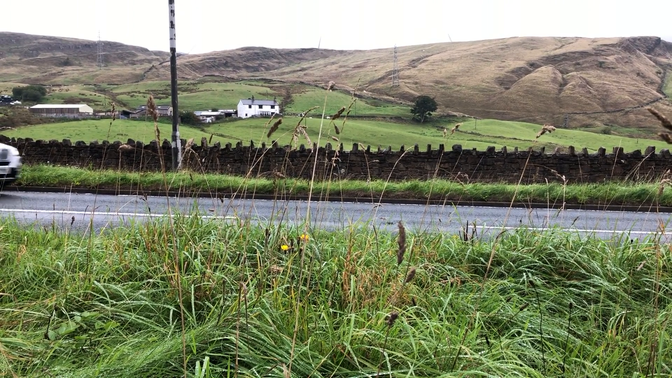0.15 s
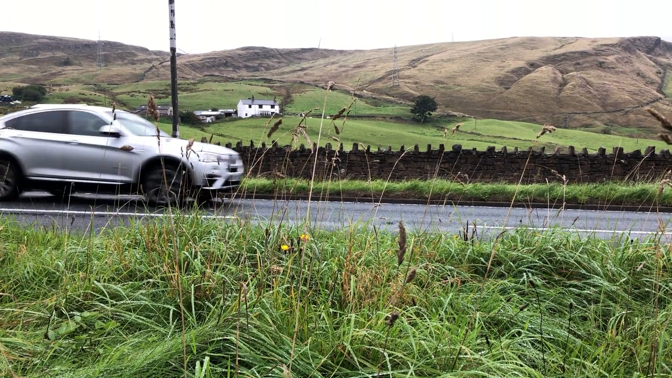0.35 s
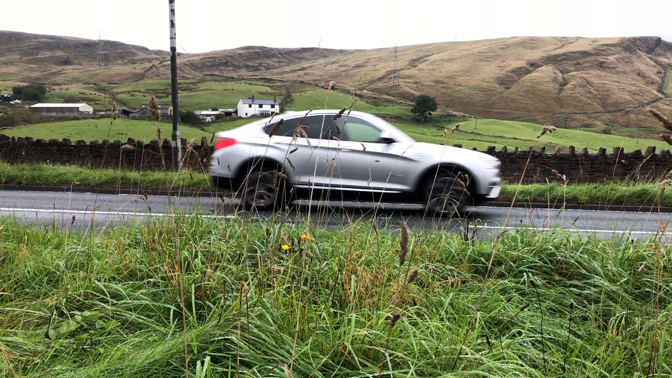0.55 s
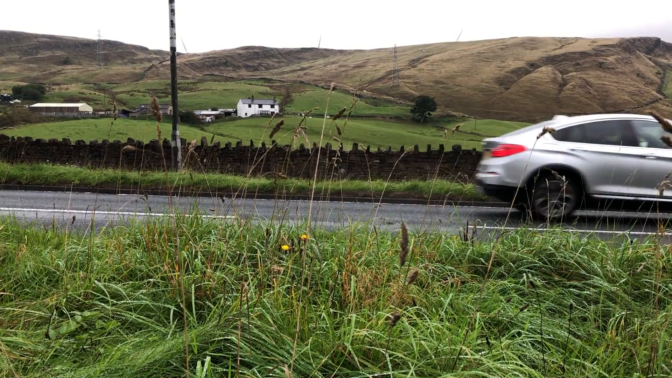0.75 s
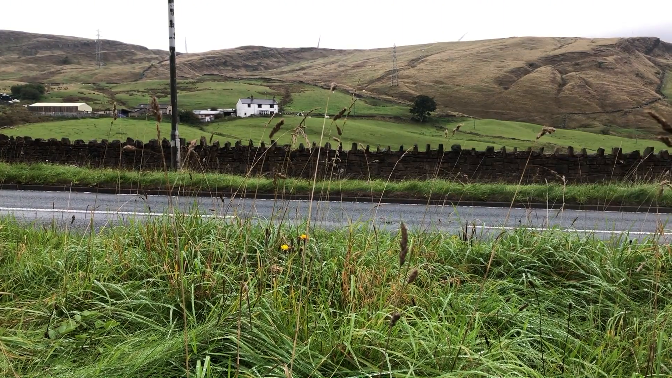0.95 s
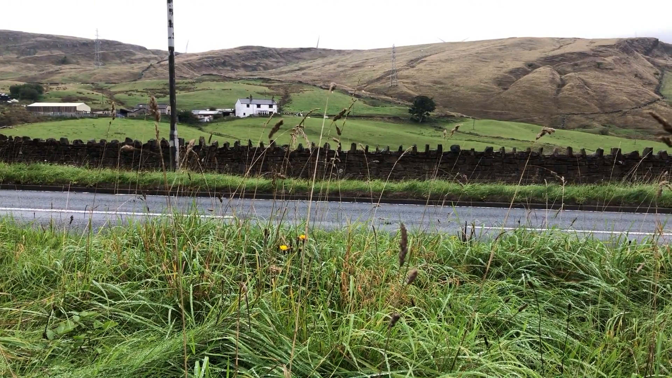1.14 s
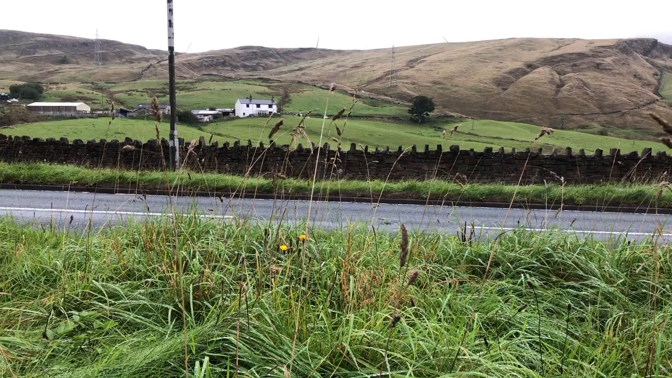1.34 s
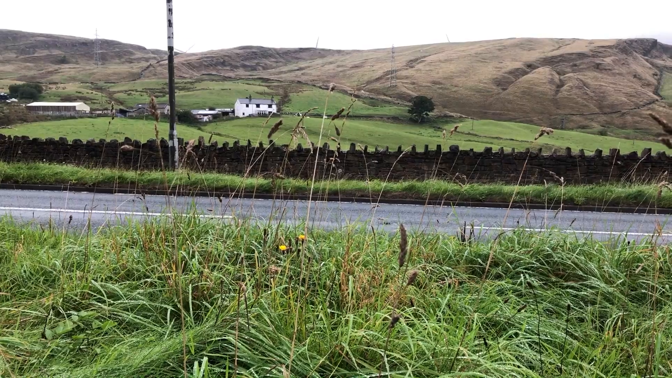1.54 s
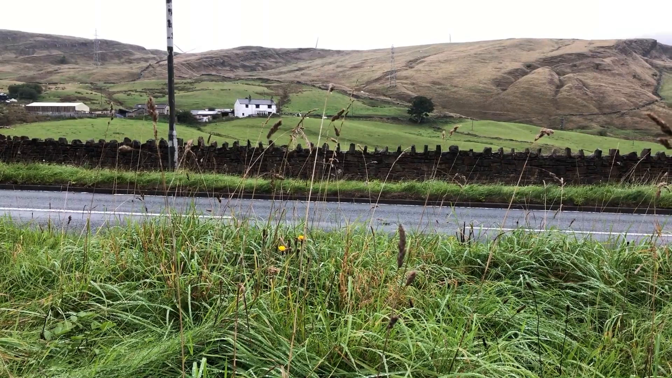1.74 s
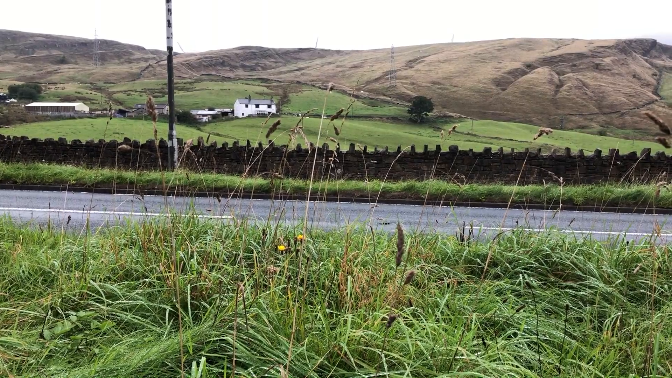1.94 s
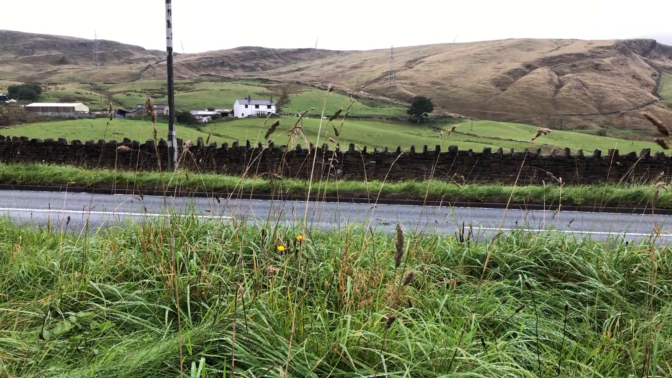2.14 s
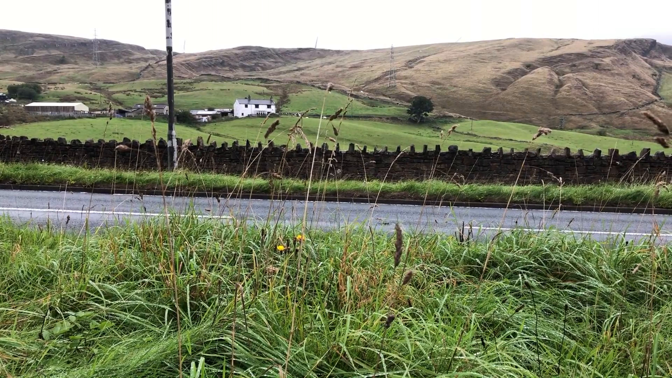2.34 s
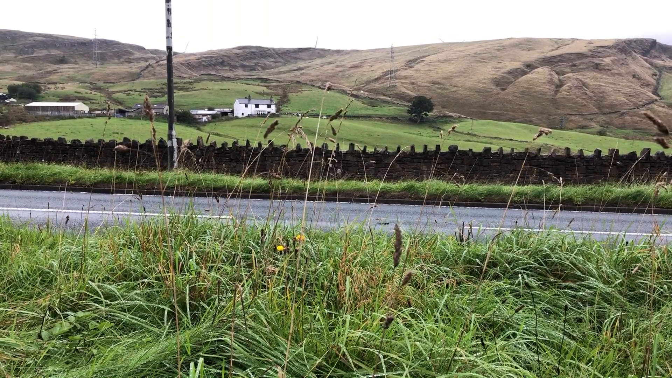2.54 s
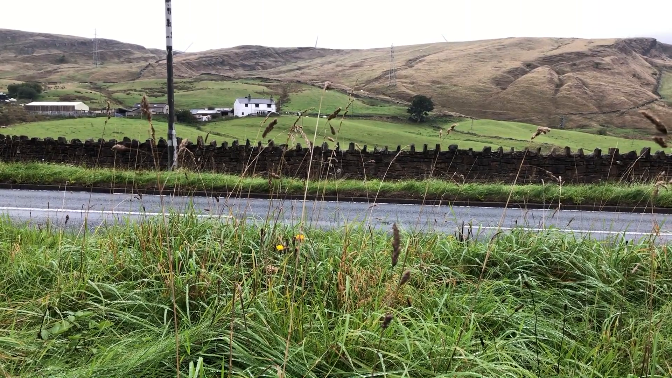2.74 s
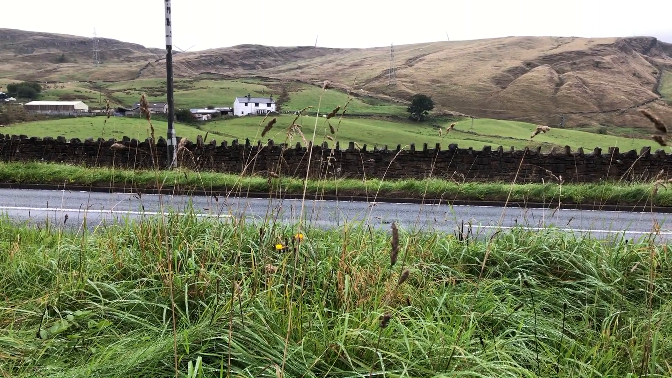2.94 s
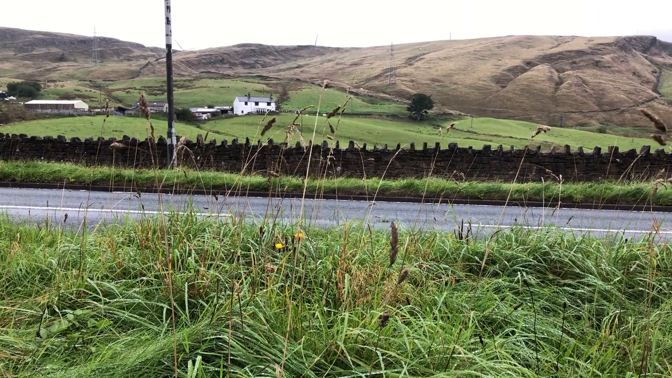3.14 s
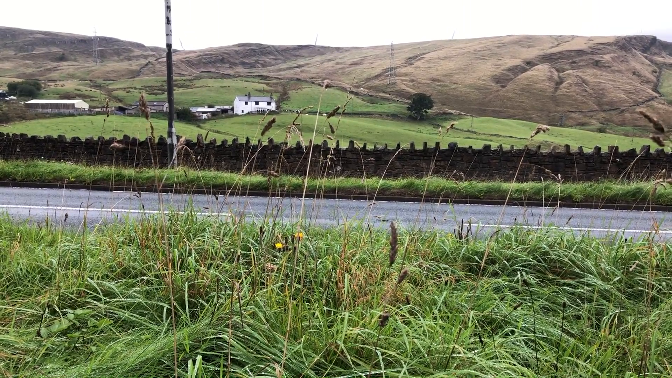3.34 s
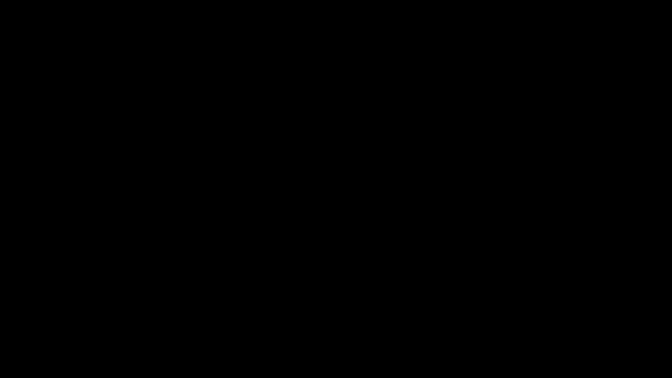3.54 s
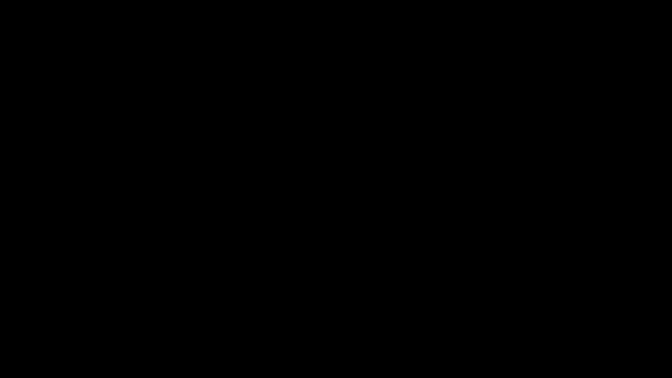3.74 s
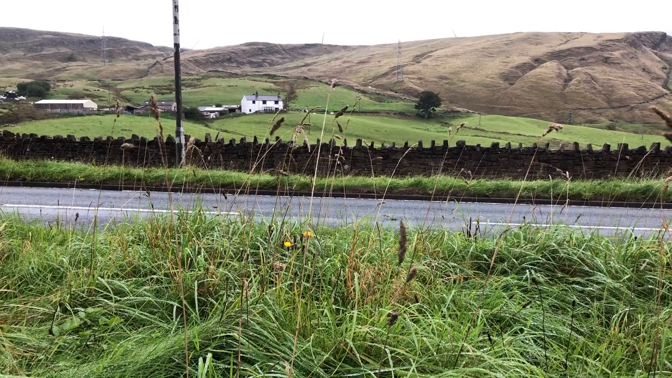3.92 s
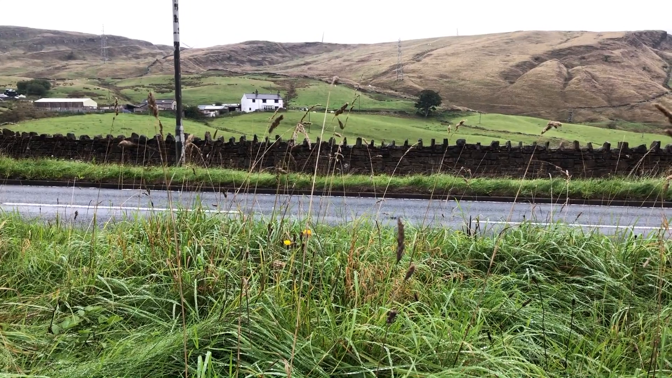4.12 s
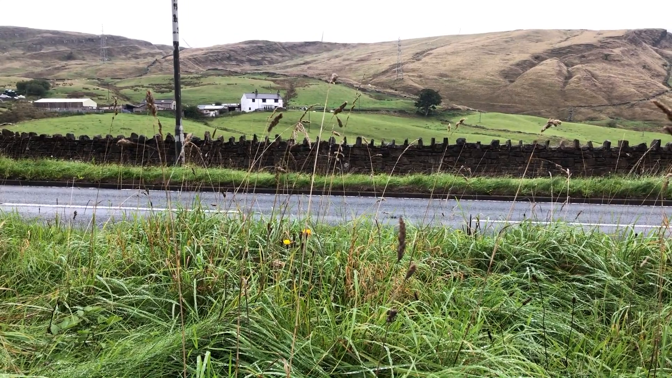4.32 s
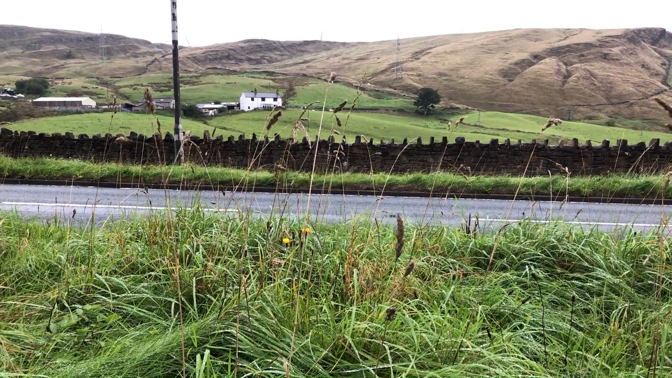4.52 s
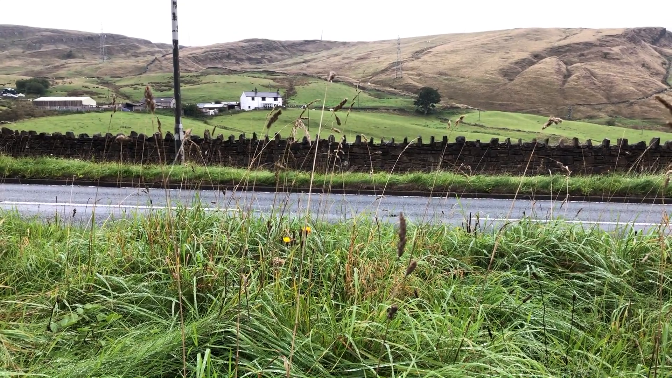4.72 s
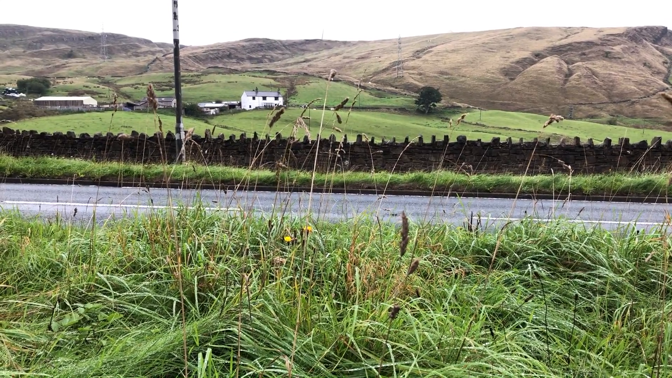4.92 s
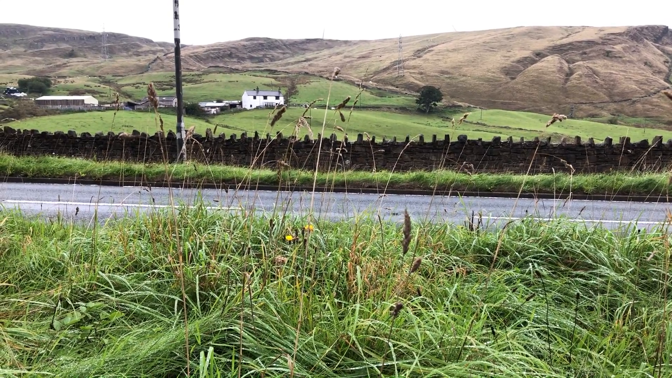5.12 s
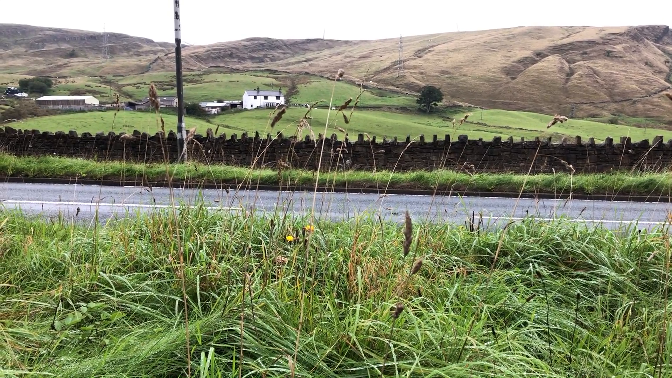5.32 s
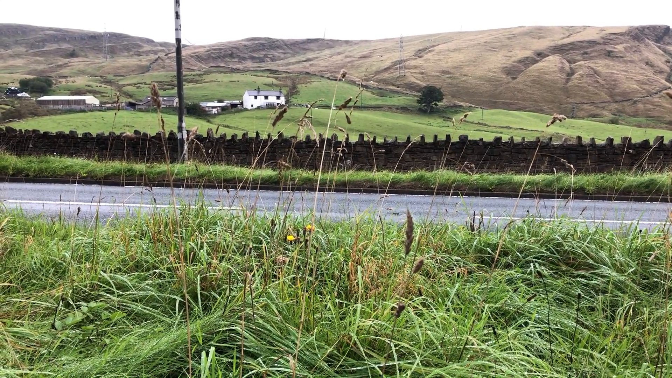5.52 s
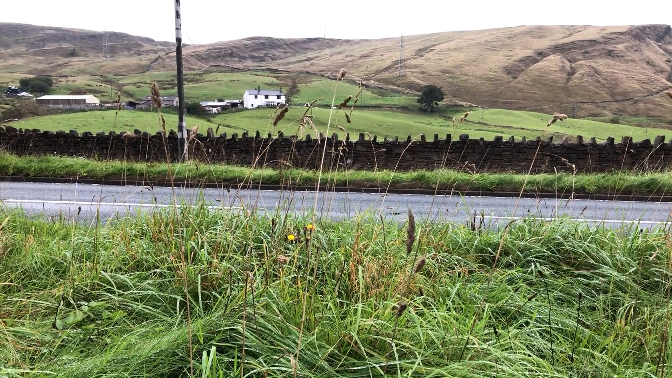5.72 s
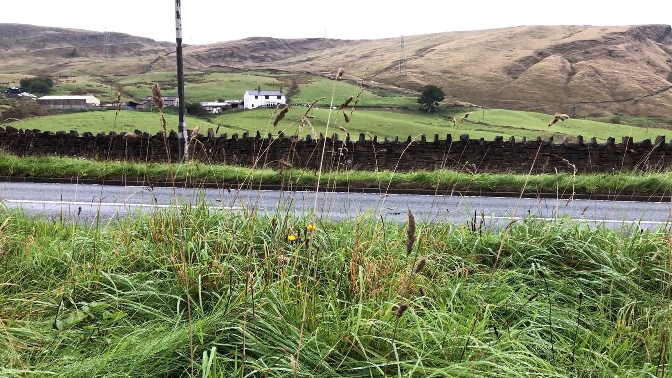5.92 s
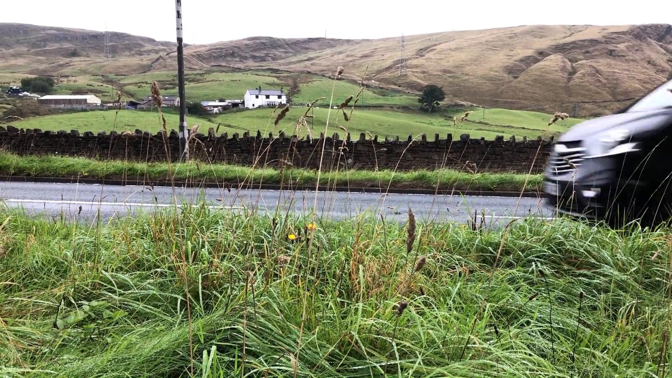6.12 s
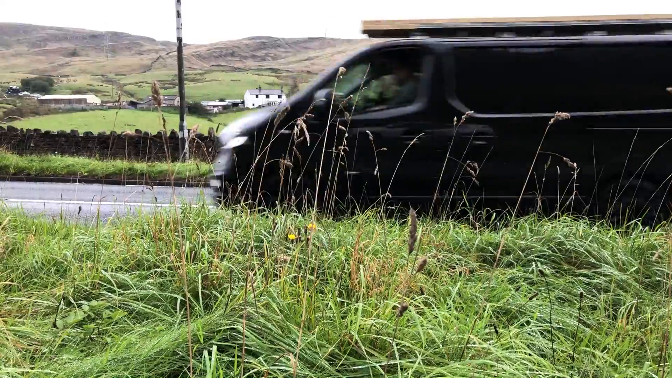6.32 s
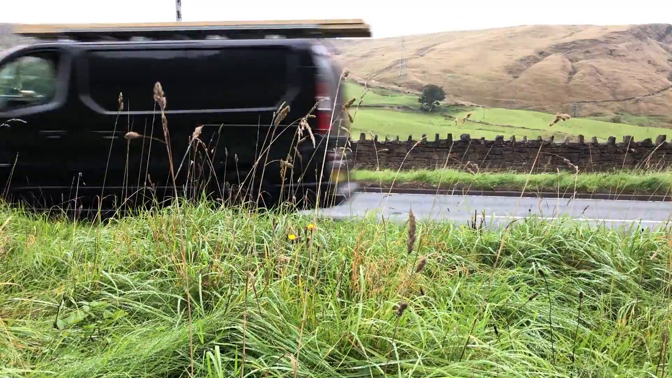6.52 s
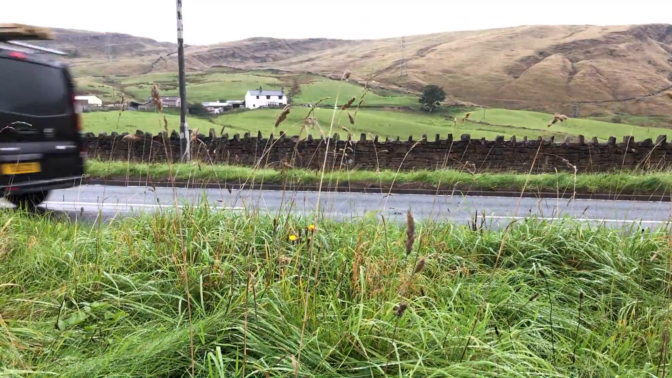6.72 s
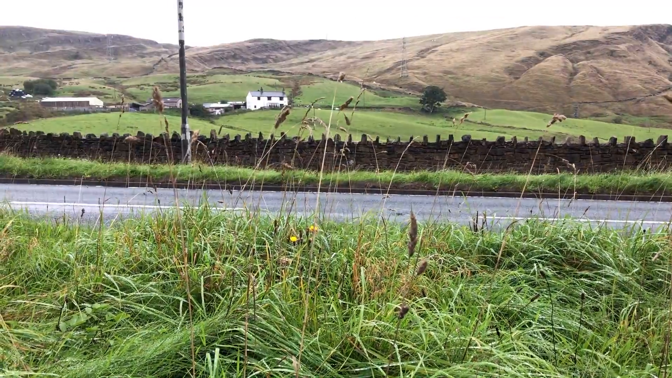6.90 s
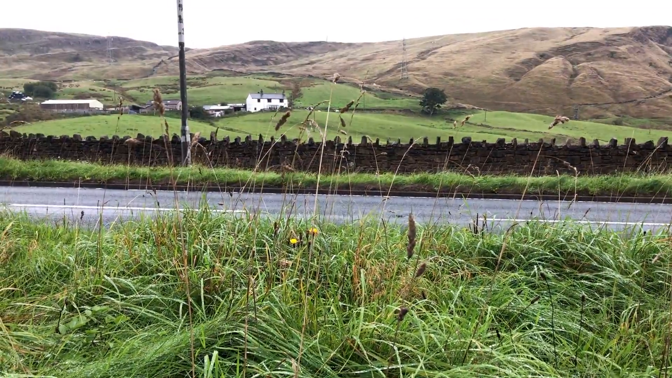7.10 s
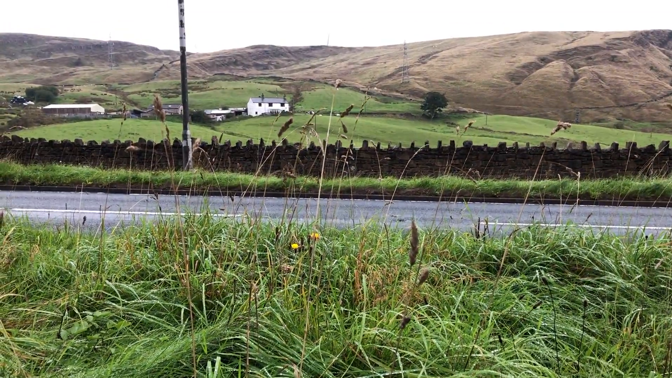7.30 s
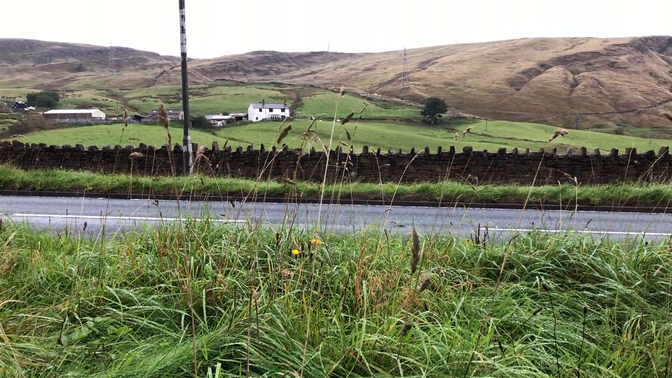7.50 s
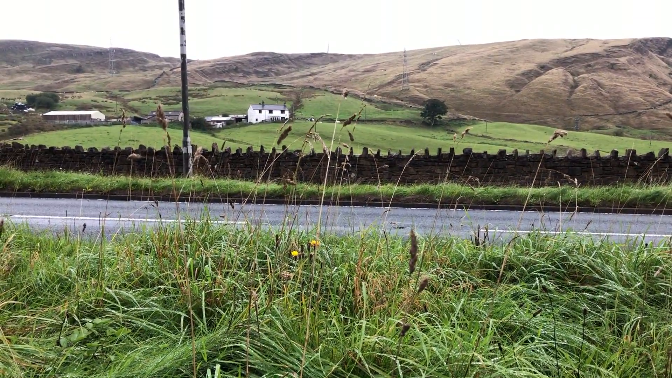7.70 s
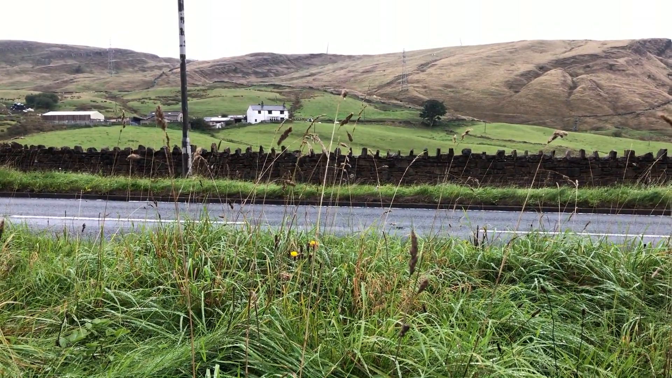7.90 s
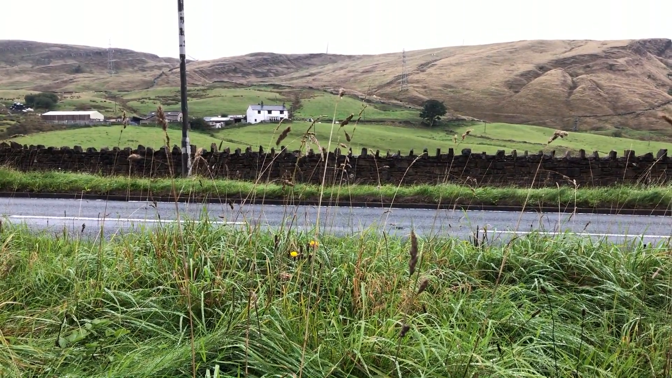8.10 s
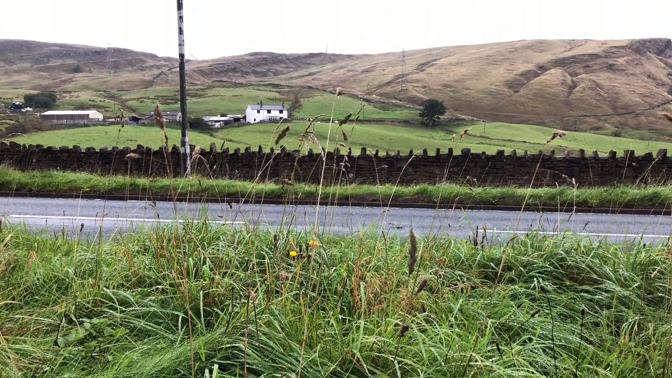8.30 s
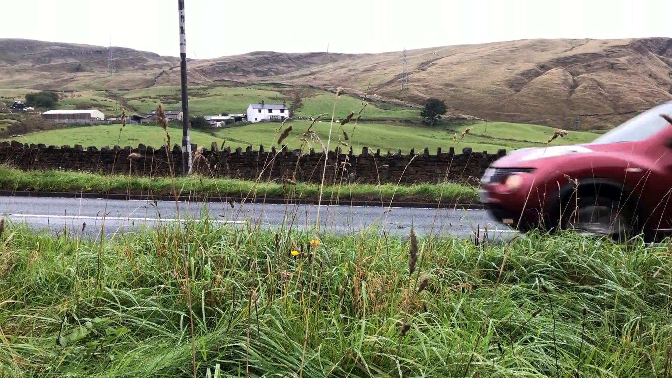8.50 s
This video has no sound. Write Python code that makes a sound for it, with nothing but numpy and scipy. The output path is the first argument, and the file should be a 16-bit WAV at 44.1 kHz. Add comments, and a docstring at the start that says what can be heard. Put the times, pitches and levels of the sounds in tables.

```python
"""On the grass verge of a wet country road, three vehicles pass: a car in the far lane, then a diesel
van and a second car in the near lane. Tyres roar and throw up water, bodies rumble, and each engine
note drops as it goes by. These sounds swell and fade with the vehicle's distance, and far away the
soft ground swallows the low middle of the roar. Distant traffic hums, a breeze thrums on the
microphone and a few drops tick in the grass."""
import sys
import numpy as np
from scipy import signal
from scipy.fft import rfft, irfft, next_fast_len
from scipy.io import wavfile

SR = 44100
rng = np.random.default_rng(int(sys.argv[2]) if len(sys.argv) > 2 else 0)


def put_to_file(sound):
    """Save the sound as 16-bit audio at rate SR, in the file named by the first command-line argument."""
    columns = np.atleast_2d(sound).T  # one column per channel
    safe = np.clip(columns, -1, 1)
    whole_steps = np.round(safe * 32767)
    wavfile.write(sys.argv[1], SR, whole_steps.astype(np.int16))


N = 377055
T = np.arange(N) / SR
SOUND_SPEED = 343  # metres a second


def from_db(db):
    """Turn decibels into a gain, the number a sound is multiplied by."""
    return 10 ** (np.asarray(db) / 20)


def unit_power(x):
    """Scale a sound so that its average power is 1."""
    return x / np.sqrt(np.mean(x ** 2) + 1e-20)


def drift(per_s):
    """A random wobble of about size 1 that turns some per_s times a second."""
    return unit_power(np.interp(T * per_s, np.arange(4096), rng.standard_normal(4096)))


def bump(at_s, length_s):
    """A smooth rise to 1 and back, taking about length_s each way."""
    return np.exp(-.5 * ((T - at_s) / length_s) ** 2)


def coloured(x, colour):
    """Give a sound a colour (a balance of low and high) that falls away steeply past its ends."""
    size = next_fast_len(N)
    octave = np.log2(np.maximum(np.arange(size // 2 + 1) * SR / size, 1))
    hz, db = np.transpose(colour)
    octaves_outside = np.abs(octave - np.clip(octave, np.log2(hz[0]), np.log2(hz[-1])))
    gain = from_db(np.interp(octave, np.log2(hz), db) - 46 * octaves_outside)
    return unit_power(irfft(rfft(x, size) * gain, size)[:N])


def noise(colour):
    """Smooth noise of one colour."""
    return coloured(rng.standard_normal(N), colour)


def band_noise(low_hz, high_hz):
    """Noise that lies mostly between two frequencies."""
    band = signal.butter(2, [low_hz, min(high_hz, .45 * SR)], "band", fs=SR, output="sos")
    return signal.sosfilt(band, rng.standard_normal(N))


def narrow_noise(pitch_hz, width_hz):
    """An uneven tone around a moving pitch."""
    smoothing = signal.butter(2, width_hz, fs=SR, output="sos")
    wobble = signal.sosfilt(smoothing, rng.standard_normal((2, N)))
    phase = 2 * np.pi * np.cumsum(pitch_hz) / SR
    return unit_power(wobble[0] * np.cos(phase) + wobble[1] * np.sin(phase))


def surges(rows, width_ratio):
    """Short swells of noise, each around its own pitch."""
    return sum(from_db(db) * bump(at_s, length_s)
               * unit_power(band_noise(hz / width_ratio, hz * width_ratio))
               for at_s, db, length_s, hz in rows)


def crossfade(first, second, at_s, over_s):
    """Fade one sound out while the next fades in."""
    share = .5 + .5 * np.tanh((T - at_s) / over_s)
    return np.sqrt(1 - share) * first + np.sqrt(share) * second


def far_to_near(far_lane, near_lane, at_s=4.15, dip_db=5):
    """The scene changes: the far lane's sound fades out as the near lane's fades in, and the level dips
    briefly."""
    dip = from_db(-dip_db * bump(at_s, length_s=0.15))
    return crossfade(far_lane, near_lane, at_s, over_s=0.084) * dip


# The vehicles: (passing time [s], speed [m/s], closest distance [m], firing rate [Hz],
# base engine level [dB])
CAR = (0.5241, 20, 7.5, 123, -38.5)
VAN = (6.3, 20, 5, 65, -32)
SECOND_CAR = (8.7, 18, 5, 88, -28)
VEHICLES = [CAR, VAN, SECOND_CAR]
def distance(vehicle):
    """Metres from the listener to a vehicle driving steadily along the straight road."""
    passing_s, speed, closest_m = vehicle[:3]
    return np.hypot(closest_m, speed * (T - passing_s))


def swells(rows):
    """One gain curve per vehicle: it loses a set number of dB each time the distance doubles."""
    gains = []
    for vehicle, (peak_db, delay_s, width_m, coming_db, going_db) in zip(VEHICLES, rows):
        passing_s, speed = vehicle[:2]
        along_m = speed * (T - passing_s - delay_s)
        doublings = np.log2(np.hypot(1, along_m / width_m))
        gains.append(from_db(peak_db - np.where(along_m < 0, coming_db, going_db) * doublings))
    return gains


def passing_noise(vehicle, near_colour, far_colour, reach_m):
    """Close by a vehicle sounds full; beyond reach_m its sound skims the grass and turns hollow."""
    extra_m = distance(vehicle) - vehicle[2]
    near_share = 1 / (1 + (extra_m / reach_m) ** 2)
    return np.sqrt(near_share) * noise(near_colour) + np.sqrt(1 - near_share) * noise(far_colour)


def engine(vehicle, tones, rough, wander):
    """Cylinders fire in a hum. Its travel time shrinks, then grows, so the note drops on passing."""
    closest_m, firing_hz, level_db = vehicle[2:]
    away_m = distance(vehicle)
    firings = firing_hz * (T - away_m / SOUND_SPEED + wander * np.cumsum(drift(6)) / SR)
    note = sum(from_db(db) * (1 + rough * drift(25))
               * np.sin(2 * np.pi * (multiple * firings + rng.random())) for multiple, db in tones)
    return from_db(level_db) * unit_power(note) * closest_m / away_m


# The tones in an engine's hum: (multiple of the firing rate, relative level [dB])
PETROL_TONES = [(1, -2.5), (2, -8), (3, -5), (4, -11)]
DIESEL_TONES = [(1, 0), (1.5, -14), (2, -3), (2.5, -9), (3, -11), (4, -13), (5, -14)]
def engines():
    """Three engines hum in turn; the first dies away before the van's comes through."""
    car = engine(CAR, PETROL_TONES, rough=0.44, wander=0.0137)
    van = engine(VAN, DIESEL_TONES, rough=.15, wander=.005)
    second_car = engine(SECOND_CAR, PETROL_TONES, rough=0.25, wander=0.0036)
    # the van blocks the second car's sound until it has gone by
    near_lane = van + crossfade(0, second_car, at_s=8.0, over_s=0.65)
    return crossfade(car, 0, at_s=2.8, over_s=0.36) + crossfade(0, near_lane, at_s=5.4, over_s=0.45)


def tyre_boom(vehicle, pitch_hz=204.6, relative_db=-10):
    """The air inside a tyre rings with a low note that drops on passing."""
    pitch_shift = 1 - np.gradient(distance(vehicle), T) / SOUND_SPEED
    return from_db(relative_db) * narrow_noise(pitch_hz * pitch_shift, width_hz=7.3)


# How each vehicle's rumble swells: (base peak level [dB], delay after passing [s], half-width
# along the road [m], loss per doubling of distance coming [dB], the same going [dB])
RUMBLE_SWELLS = [(-21.5, 0.11, 9.6, 2.5, 9.5), (-22, 0.14, 5.9, 7.5, 6.7), (-20, 0.01, 3.6, 5.5, 7)]
# Colours of the rumble: (frequency [Hz], relative level [dB])
CAR_RUMBLE_NEAR = [(45, -21), (70, -12), (95, 0.5), (135, 0.5), (180, -5.5), (230, 2.5), (310, -3),
                   (380, -21)]
CAR_RUMBLE_FAR = [(45, -31.5), (70, -18), (95, -2.5), (130, -4.5), (175, 1.5), (235, -0.5), (310, -5.5),
                  (380, -16)]
NEAR_LANE_RUMBLE = [(58, -20), (75, 0), (100, 0), (150, 4), (190, 0.5), (245, 2), (315, -1.5), (380, -16.5)]
def rumble(uneven_db=0.36):
    """The coarse, uneven road shakes tyre walls and body panels."""
    car, van, second_car = swells(RUMBLE_SWELLS)
    shaking = passing_noise(CAR, CAR_RUMBLE_NEAR, CAR_RUMBLE_FAR, reach_m=6.9)
    far_lane = car * (shaking + tyre_boom(CAR))
    near_lane = np.hypot(van, second_car) * noise(NEAR_LANE_RUMBLE)
    return far_to_near(far_lane, near_lane) * from_db(uneven_db * drift(9))


# The ring of each vehicle's tread: (pitch coming [Hz], pitch going [Hz], level against the roar
# coming [dB], the same going [dB], delay of the shift after passing [s])
TREAD_RINGS = [(927, 1090, -10.5, -11.5, .42), (1565, 1200, -8.5, -12, .1), (1126, 1000, -12, -17, 0.038)]
def tread_rings():
    """Unevenly spaced tread blocks give each vehicle a blurry note that shifts as it goes by."""
    rings = []
    for vehicle, (coming_hz, going_hz, coming_db, going_db, delay_s) in zip(VEHICLES, TREAD_RINGS):
        gone = .5 + .5 * np.tanh((T - vehicle[0] - delay_s) / .2)  # 0 coming, 1 going
        gain = from_db(coming_db + gone * (going_db - coming_db))
        rings.append(gain * narrow_noise(coming_hz + gone * (going_hz - coming_hz), width_hz=59))
    return rings


# How each vehicle's roar swells: columns as in RUMBLE_SWELLS
ROAR_SWELLS = [(-20, 0.018, 12.5, 6.1, 12.85), (-22.5, 0.15, 9, 9.7, 10), (-21, 0.059, 5.63, 7.8, 7)]
# Colours of the roar, close by and far off: (frequency [Hz], relative level [dB])
CAR_ROAR_NEAR = [(330, -7), (390, -1.5), (470, -3), (580, -5), (760, -2.5), (930, 1.5), (1250, -3.5),
                 (1470, -3), (1850, -4.5), (2300, -11), (2900, -17.5)]
CAR_ROAR_FAR = [(330, -17), (440, -15), (650, -12.5), (860, -1), (1040, -4), (1300, 2.5), (1650, 0.5),
                (1900, -10), (2300, -13), (2900, -13.5)]
VAN_ROAR_NEAR = [(330, -8), (380, -3), (490, -3), (600, -7.5), (800, -3.5), (940, 0.5), (1120, -5),
                 (1450, -6), (1960, -11.5), (2900, -18.5)]
VAN_ROAR_FAR = [(330, -4), (380, -10), (460, -4.5), (590, -10.5), (780, -6), (950, -4.5), (1200, -1.5),
                (1550, -2), (1900, -5), (2300, -12), (2900, -16.5)]
SECOND_CAR_ROAR_NEAR = [(330, -11), (440, -3), (600, -6.5), (760, -1.5), (1080, 0), (1600, -5),
                        (1900, -9.5), (2900, -20.5)]
SECOND_CAR_ROAR_FAR = [(330, 0), (450, -2), (650, -4), (920, 6), (1300, 6), (1900, -1), (2400, -17),
                       (2900, -34)]
TRAFFIC_ROAR = [(190, -48), (330, -21), (454, -21), (511, -19.5), (671, -17.5), (755, -8.5), (1020, -1.5),
                (1450, -8.5), (1770, -7), (2460, -24.5), (2900, -25.5), (3770, -45), (6380, -120)]
def tyre_roar(traffic_db=-41.5, flutter_db=.5):
    """Tyre treads roar on the road, under the three vehicles and in the distant traffic."""
    roars = [passing_noise(CAR, CAR_ROAR_NEAR, CAR_ROAR_FAR, reach_m=13.6),
             passing_noise(VAN, VAN_ROAR_NEAR, VAN_ROAR_FAR, reach_m=5.0),
             passing_noise(SECOND_CAR, SECOND_CAR_ROAR_NEAR, SECOND_CAR_ROAR_FAR, reach_m=8.9)]
    car, van, second_car = [gain * (roar + ring)
                            for gain, roar, ring in zip(swells(ROAR_SWELLS), roars, tread_rings())]
    traffic = from_db(traffic_db) * noise(TRAFFIC_ROAR)
    return far_to_near(car + traffic, van + second_car) * from_db(flutter_db * drift(40))


def droplets(per_s, spread_db):
    """Drops land at random, many small and a few large."""
    sizes = from_db(spread_db * np.minimum(rng.exponential(1, N), 4))
    return unit_power(sizes * rng.choice([-1, 1], N) * (rng.random(N) < per_s / SR))


def water_hiss(colour, crackle, flutter_db, patchy_db=1.2):
    """A wet hiss whose narrow bands flicker at random, with a crackle of drops in it."""
    edges_hz = np.geomspace(.8 * colour[0][0], 1.15 * colour[-1][0], 13)  # twelve bands
    hiss = sum(band_noise(low, high) * from_db(patchy_db * drift(22))
               for low, high in zip(edges_hz, edges_hz[1:]))
    drops = crackle * droplets(per_s=1200, spread_db=3.0)
    return coloured(hiss + drops, colour) * from_db(flutter_db * drift(45))


def lane_gains(rows, traffic_db):
    """Two gain curves: the far lane with the distant traffic, and the near lane."""
    car, van, second_car = swells(rows)
    far_lane = np.hypot(car, from_db(traffic_db))
    near_lane = np.hypot(van, second_car)
    return far_to_near(far_lane, 0), far_to_near(0, near_lane)


# How each vehicle's wash (swish plus spray) and mist swell: columns as in RUMBLE_SWELLS
WASH_SWELLS = [(-40.5, 0.071, 10.1, 9.7, 9.77), (-39.5, 0.35, 12.35, 13.5, 13.4),
               (-41.5, 0.14, 4.8, 6.6, 7)]
MIST_SWELLS = [(-54.8, .24, 10, 11, 11.4), (-53.5, .31, 12.6, 15, 20), (-53.5, .12, 4.1, 7.7, 7)]
# Colours of the flying water: (frequency [Hz], relative level [dB])
SWISH = [(2100, 0.5), (2650, 0.5), (3000, -0.5), (3900, -5), (5000, -9.5), (5900, -18.5), (7500, -17.5)]
SPRAY = [(4300, -5), (5600, -1), (6500, -1), (8200, -3), (9800, -6.5), (10800, -13.5), (13000, -27)]
FAR_LANE_MIST = [(9000, -7), (10800, 0.5), (12500, 2), (14000, -3.5), (15700, -10)]
NEAR_LANE_MIST = [(9000, -6), (10800, 1), (12500, 0), (14000, -3.5), (15700, -7)]
def tyre_water(swish_gain_db=4.0, spray_gain_db=-2.5, spurt_db=0.31, puddle_db=0.1):
    """The tread squeezes water out, flings it up as spray and trails a mist, all in uneven spurts."""
    swish = from_db(swish_gain_db) * water_hiss(SWISH, crackle=0.49, flutter_db=0.8)
    spray = from_db(spray_gain_db) * water_hiss(SPRAY, crackle=0.55, flutter_db=0.1)
    wash = (swish + spray) * np.hypot(*lane_gains(WASH_SWELLS, traffic_db=-71))
    far_lane, near_lane = lane_gains(MIST_SWELLS, traffic_db=-90)
    mist = far_lane * water_hiss(FAR_LANE_MIST, crackle=.5, flutter_db=0)
    mist += near_lane * water_hiss(NEAR_LANE_MIST, crackle=0.59, flutter_db=1.5)
    return (wash + mist) * from_db(spurt_db * drift(55) + puddle_db * drift(7.8))


# Colour of the breeze: (frequency [Hz], relative level [dB])
BREEZE = [(12, -16), (25, -7), (42, -4), (60, -4), (100, -0.5), (200, -24)]
# Gusts of air: (time [s], level [dB], length [s])
GUSTS = [(.62, -39, 0.15), (3.0, -68, 0.64), (4.98, -45, 0.055), (5.396, -53.5, 0.34), (6.515, -48, .14)]
def breeze(steady_db=-53):
    """Moving air thrums on the microphone, swelling in gusts and in the wake of a vehicle."""
    gusts = sum(from_db(db) * bump(at_s, length_s) for at_s, db, length_s in GUSTS)
    return noise(BREEZE) * (from_db(steady_db) + gusts)


# Short booms and hums: (time [s], level [dB], length [s], pitch [Hz])
BRIEF_SWELLS = [(.54, -22.5, 0.028, 201), (.76, -20.5, 0.022, 205), (.93, -25, 0.076, 192),
                (1.05, -27, .04, 1070), (1.78, -35.5, 0.039, 263), (6.17, -26, 0.032, 200),
                (6.44, -26, 0.057, 884), (6.55, -31, 0.16, 473)]
def brief_swells():
    """Short booms and hums swell for a moment in the rumble and roar."""
    return surges(BRIEF_SWELLS, width_ratio=1.116)


# Splashes: (time [s], level [dB], length [s], middle frequency [Hz])
SPLASHES = [(1.65, -55.5, .14, 4200), (2.3, -56, 0.14, 4500), (3.55, -61, .11, 4140),
            (6.578, -35, 0.004, 3600), (6.604, -32, 0.0058, 3260), (6.772, -39.5, 0.028, 4900),
            (6.955, -38, 0.023, 4000), (7.135, -38, 0.008, 3280), (7.66, -49.5, 0.037, 6460),
            (7.84, -49, 0.028, 5950)]
def splashes():
    """Tyres slap through standing water, each time with a short, broad hiss."""
    return surges(SPLASHES, width_ratio=1.48)


# Drops in the grass: (time [s], level [dB], fade time [s], lowest frequency [Hz], highest [Hz])
GRASS_DROPS = [(2.608, -36, 0.003, 2100, 3100), (2.61, -43, 0.002, 3500, 8500),
               (2.652, -50, .003, 6000, 7600), (3.028, -57, .003, 7000, 9000),
               (3.098, -56.5, .007, 6800, 9000), (3.113, -55, .009, 6700, 8700)]
def grass_drops():
    """A drop strikes a blade of grass: a sharp tick that dies at once."""
    ticks = np.zeros(N)
    for at_s, db, fade_s, low_hz, high_hz in GRASS_DROPS:
        fade = (T >= at_s) * np.exp(-np.abs(T - at_s) / fade_s)
        ticks += from_db(db) * fade * unit_power(band_noise(low_hz, high_hz))
    return ticks


def scene():
    """Everything meets at one microphone in the open."""
    vehicles = engines() + rumble() + tyre_roar() + brief_swells()
    water = tyre_water() + splashes() + grass_drops()
    return (vehicles + water + breeze())[None]


def record(dry, cutoff_hz=15700):
    """The very highest treble is cut off steeply."""
    return signal.sosfilt(signal.ellip(12, .1, 90, cutoff_hz, fs=SR, output="sos"), dry)


dry = scene()
out = record(dry)
put_to_file(out)
```